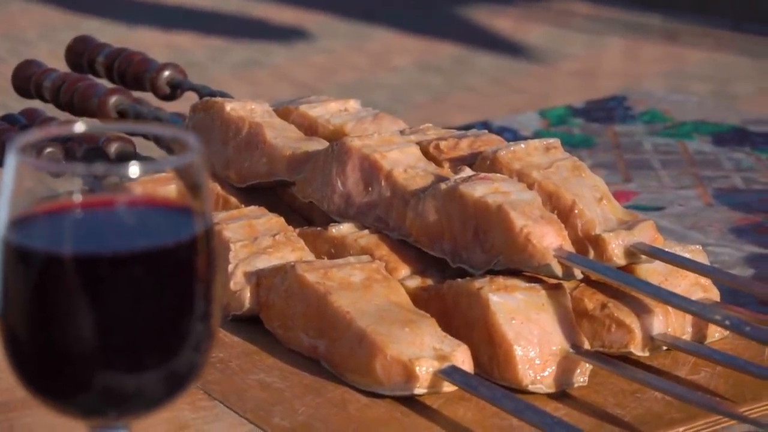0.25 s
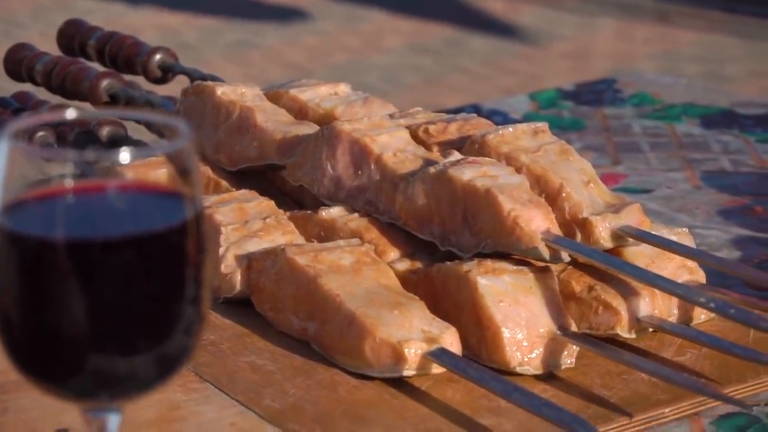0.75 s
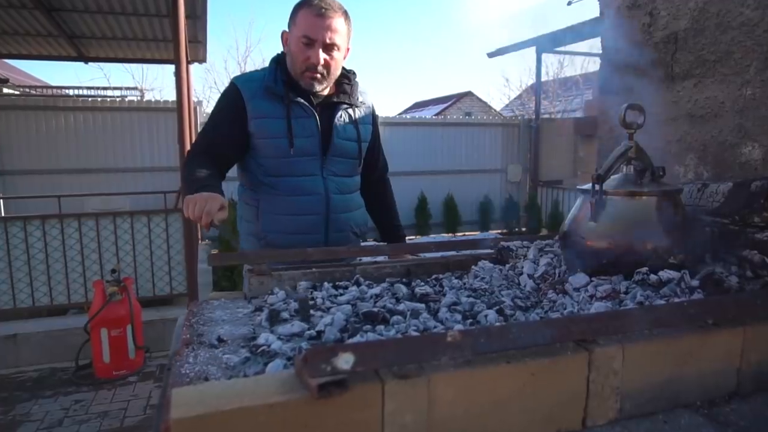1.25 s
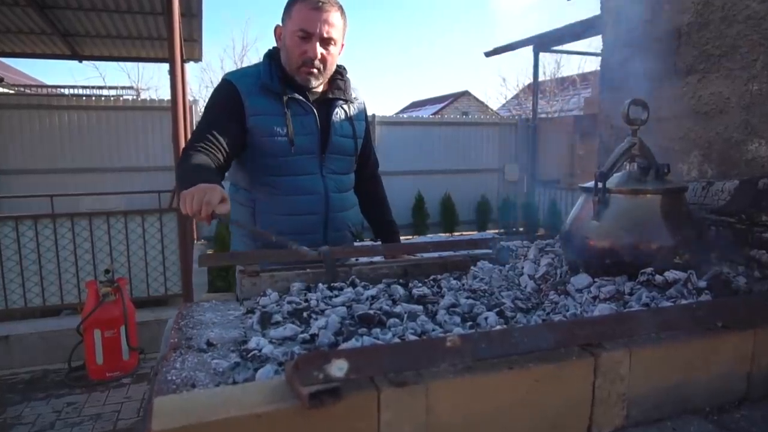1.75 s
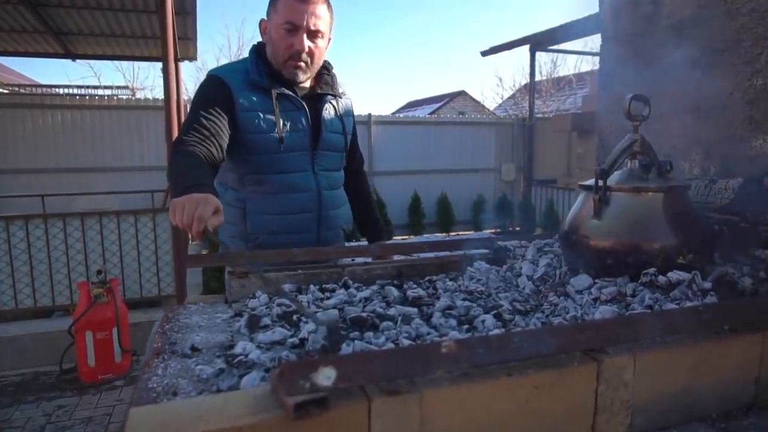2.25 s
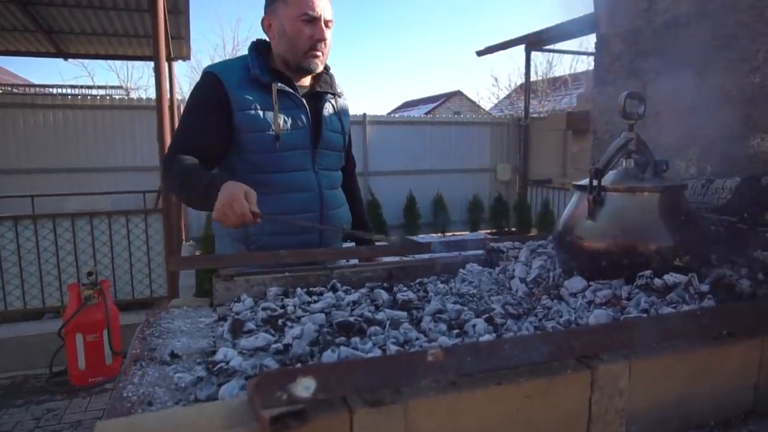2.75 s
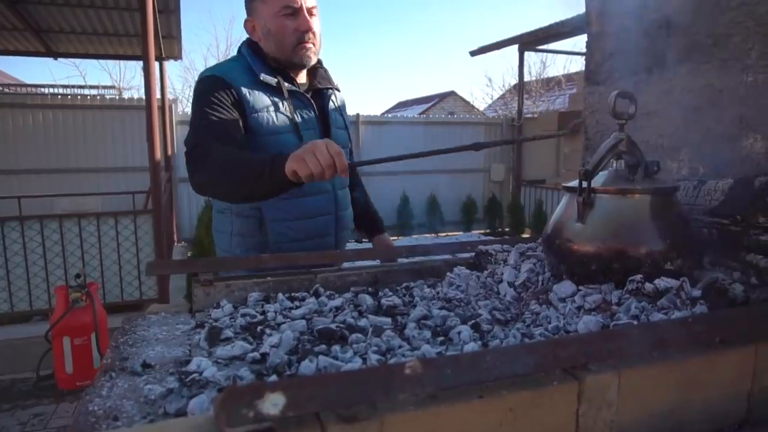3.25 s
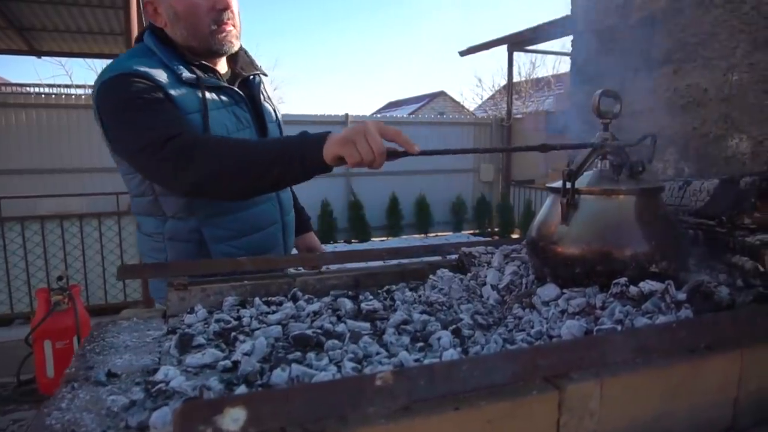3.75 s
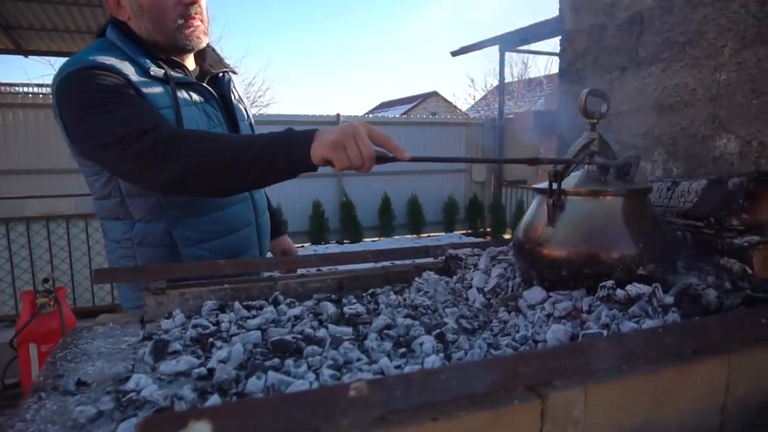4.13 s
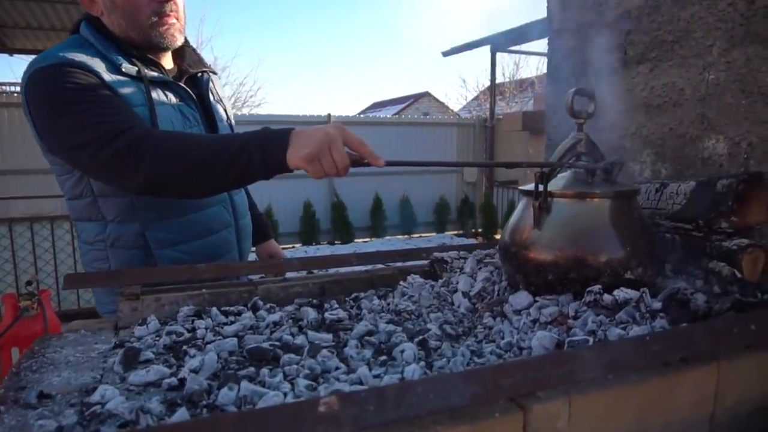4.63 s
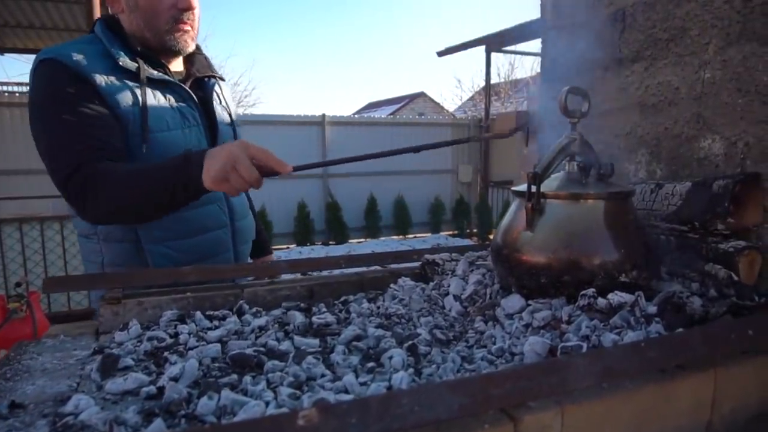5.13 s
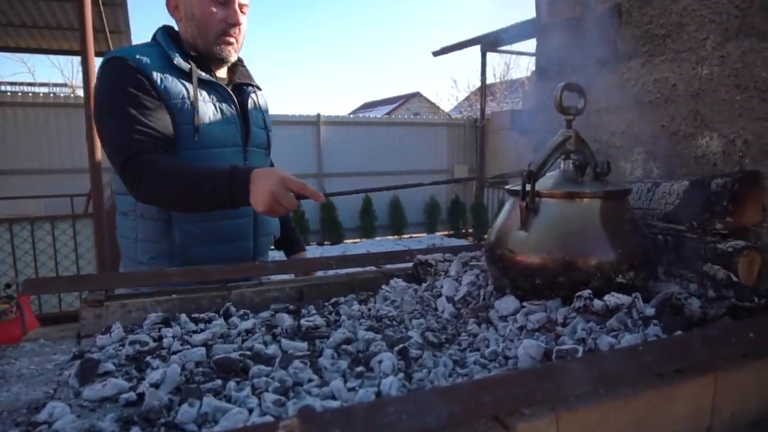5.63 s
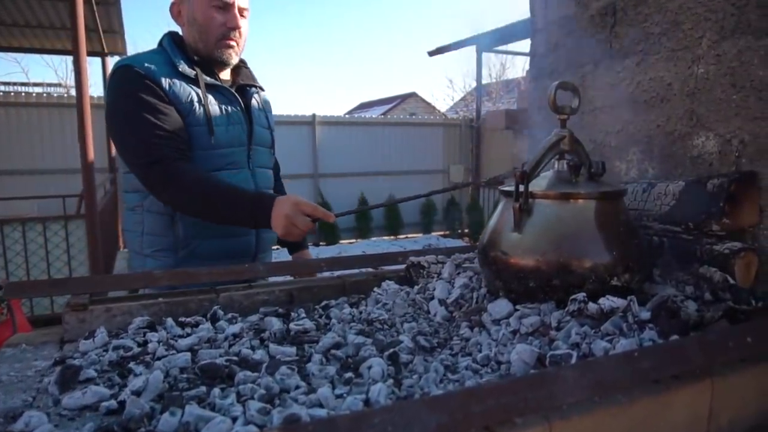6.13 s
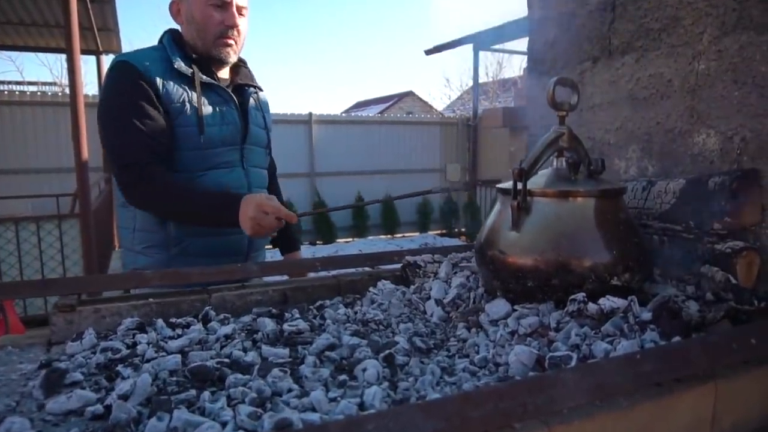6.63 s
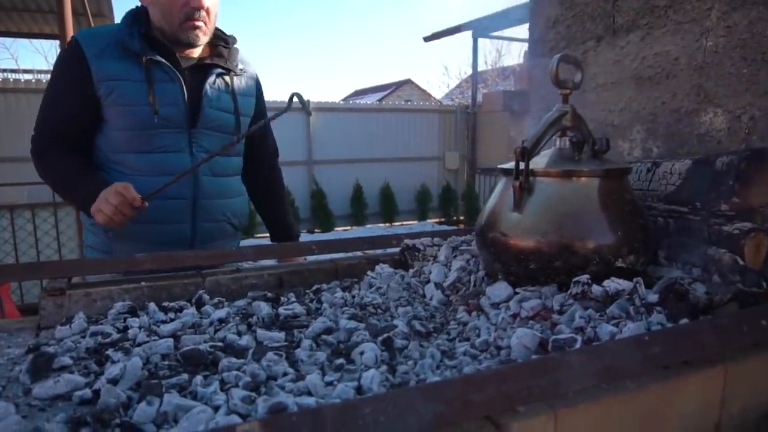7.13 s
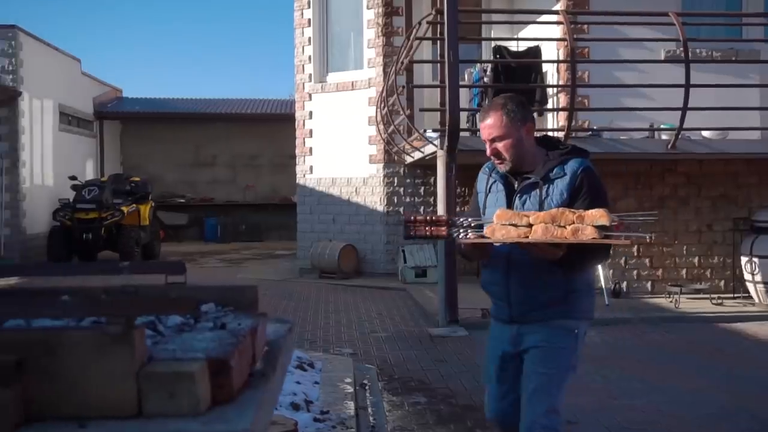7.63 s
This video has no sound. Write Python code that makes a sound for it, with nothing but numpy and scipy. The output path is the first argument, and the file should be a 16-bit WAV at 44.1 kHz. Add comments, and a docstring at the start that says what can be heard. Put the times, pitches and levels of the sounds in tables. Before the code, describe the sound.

Calm yard rumble cuts to leaking steam and crunching charcoal, then a poker clanks on a valve and bright steam blasts out twice.

```python
"""First comes about a second of calm yard: a distant rumble, faint air hiss and a few ticks over a deep drone.
Then, abruptly, a pressure kettle on glowing charcoal: steam leaks past its weighted valve as flickering noise.
A poker stabs the coals (clusters of clicks), then clanks on the valve (ringing modes) and lifts it, so steam jets out.
Shoes scuff the paving, embers crackle as random clicks, and the yard behind is smooth coloured noise.
A gain control holds the loud jets nearly level, so the yard sinks beneath them."""
import sys
import numpy as np
from scipy import signal
from scipy.fft import rfft, irfft, next_fast_len
from scipy.io import wavfile
from scipy.ndimage import uniform_filter1d, map_coordinates

SR = 44100
rng = np.random.default_rng(int(sys.argv[2]) if len(sys.argv) > 2 else 0)


def unload_audio(sound):
    """Save the sound as a 16-bit wav file, at the path given as the first command line argument."""
    columns = np.transpose(np.atleast_2d(sound))
    # keep every value between -1 and 1, then stretch to whole-number steps
    steps = np.round(np.clip(columns, -1, 1) * 32767)
    wavfile.write(sys.argv[1], SR, steps.astype(np.int16))


N = 347688
TIME = np.arange(N) / SR   # seconds

# All "colours" are spectra: pitch_hz, level_db (power per Hz, only the shape counts)

# Steam leaking past the seated valve: time_s, level_db, top_db (treble above 9600 Hz, relative to the rest)
LEAK = [(0.96, -33, -8.5), (1.12, -38.5, -7), (1.55, -40, -5.5), (1.95, -39, -4), (2.06, -36, -7.5),
        (2.55, -43.5, -2.5), (2.67, -38.5, -5), (2.75, -44, -2.5), (2.88, -40, -1.5), (3.32, -35.5, -3.5),
        (3.75, -37.5, -5), (3.83, -41.5, -7), (4.2, -37.5, -6), (4.9, -36, -2.5), (5.5, -35, -3.5),
        (6.55, -36.5, -4.5), (7.46, -36, -5.5), (7.6, -40.5, -4.5)]
# Colour of the leaking steam: pitch_hz, level_db
LEAK_COLOUR = [(1500, -15), (2150, -27), (3400, -15), (4050, -7.5), (4500, -10), (5100, 0.5), (5750, 1),
               (6400, -3.5), (7800, -3), (8900, -8), (10200, -16), (12000, -16), (13500, -10), (15000, -7)]
# Resonances of the narrow vent pipe: pitch_hz, width_hz (two filters in a row, each twice this wide), level_db
VENT_PIPE = [(2930, 420, -8), (5820, 330, 0), (8750, 500, -15), (14750, 700, -12)]
# From each start time the hiss has this pipe sound:
# start_s, pipe_db (relative to the leak), lowest_db (extra on the lowest resonance), wobble_db
PIPE_SOUNDS = [(0.958, -3, -4, .5), (2.75, -6, -.5, .5), (3.75, -4, -7, .5), (4.86, -3, -12, .4),
               (6.47, -15, 4, 1.7), (7.48, -19, 2, 1.0)]
# The poker lifts the valve: opens_s, attack_s, widest_s, drops_s, opening_db, swell_db (extra at the widest)
LIFTS = [(4.051, .004, 4.068, 4.071, -28, 4.5), (4.107, .01, 4.175, 4.21, -34.5, 4),
         (4.28, .009, 4.315, 4.322, -19, 1.5), (4.33, .012, 4.68, 4.858, -17.5, 9),
         (5.63, .006, 5.645, 5.652, -21.5, 2.5), (5.658, .035, 6.3, 6.462, -20.5, 7.5)]
SWELL_SHAPE = .8   # under 1 the valve lingers near its widest
JET_T60_S = .05   # time for a jet to fall by 60 dB once the valve drops
VALVE_TURNED_S = 5.5   # jets after this have the second colour
# Colour of the jets before the valve is turned: pitch_hz, level_db
FIRST_JET_COLOUR = [(700, -33), (1300, -20.5), (2600, -17.5), (3800, -13), (4900, -4), (5900, 1), (6700, 2),
                    (8000, 1.5), (9000, -1.5), (10000, -6), (12000, -7), (15500, -4.5)]
# Colour of the jets after the valve is turned: pitch_hz, level_db
SECOND_JET_COLOUR = [(600, -41), (1200, -21), (2200, -20), (3100, -15), (4400, -4), (5300, -1), (6300, 0.5),
                     (8000, 1.5), (9000, -0.5), (10200, -7), (11500, -12), (13000, -8), (14700, -5.5)]
# The hiss also arrives by a detour off a hard surface, which drifts as the listener moves
# and jumps at 7.48 s, where the position changes abruptly: time_s, lag_ms
DETOUR = [(1.7, .98), (1.85, 1.04), (2.5, 1.07), (2.65, 1.02), (3.1, 1.0), (3.55, 1.1), (4.3, 1.03),
          (4.7, 1.045), (5.5, 1.03), (5.68, 1.15), (6.0, 1.12), (6.6, 1.16), (7.478, 1.19), (7.482, .94)]
REFLECTION = .52   # strength of the reflected treble against the direct hiss

# Poker on the valve: start_s, level_db, brightness_hz, thud_db (thud of the kettle)
CLANKS = [(4.052, -22.5, 2000, -35), (4.066, -26, 2030, -33), (4.106, -25, 7000, -40),
          (4.22, -33, 1200, -45), (4.85, -23, 6000, -37), (5.504, -8, 6000, -36), (5.545, -24, 1200, -33),
          (5.631, -13.5, 7000, -20), (5.641, -25, 2500, -33), (6.423, -18, 2000, -35)]
# Ringing modes of valve and poker, before chance varies each clank: pitch_hz, level_db, t60_s
VALVE_MODES = [(493, -19, 0.047), (895, -18.5, 0.044), (1146, -5, 0.029), (1364, -8, 0.038),
               (1593, -13, 0.037), (1880, -4.5, 0.017), (2207, -27.5, 0.1), (2446, -16, 0.07),
               (2690, -10, 0.034), (2950, -11, 0.067), (3390, -1.5, 0.012), (4050, -15, 0.044),
               (4570, -12, 0.02), (6560, -12, .015)]
# After the last lift the valve rattles back onto its seat; timing and level vary around these
RATTLE_START_S, RATTLE_GAP_S, RATTLE_DB, RATTLE_HZ, RATTLE_THUD_DB = 6.447, .0125, -22.5, 3000, -46

# Poker stabbing the coals: start_s, grit_db, length_s, brightness_hz, thud_hz, thud_db
STABS = [(1.2405, -19, 0.0057, 9000, 278, -30.5), (1.5255, -29, 0.0094, 2500, 220, -34),
         (1.899, -20.5, 0.0057, 9000, 533, -36), (1.907, -21, 0.0062, 9000, 553, -38),
         (2.208, -26.5, .006, 6000, 593, -43), (2.22, -30.5, 0.011, 4000, 520, -33)]
# Colour of crunching coals: pitch_hz, level_db
COALS_COLOUR = [(200, -6), (400, -20), (570, 3.5), (850, -26), (1130, 4), (1350, -10), (1560, 1),
                (1900, -5), (2250, 0), (2600, -9), (4200, 0), (8000, 3.5), (11000, -4), (15500, -2)]
# Shoes on paving; the row at 6.423 is the low thud of the kettle as the valve drops:
# start_s, grit_db, length_s, brightness_hz, thud_hz, thud_db
SCUFFS_AND_THUD = [(3.291, -41.5, 0.011, 1500, 360, -30.5), (3.318, -39.5, 0.022, 2500, 250, -45),
                   (3.588, -42, 0.073, 1500, 450, -38), (3.655, -48, 0.062, 1000, 600, -44),
                   (6.423, -48, 0.048, 800, 158, -42.5), (6.66, -50, 0.3, 1800, 500, -58),
                   (7.519, -38, 0.025, 1200, 270, -35), (7.555, -36.5, 0.015, 2000, 182, -43),
                   (7.582, -42, .01, 1500, 200, -42), (7.6, -47, 0.17, 800, 377, -46)]
# Colour of grit on paving: pitch_hz, level_db
PAVING_COLOUR = [(200, -19.5), (600, -2.5), (1200, -0.5), (2100, 2), (3200, 1.5), (6000, 1), (14000, 2)]
# Sharp ticks and crackles: start_s, level_db (before a fixed boost), pitch_hz, t60_s
TICKS = [(.4545, -23, 5500, 0.011), (0.456, -27, 1630, 0.039), (0.521, -28.5, 7000, .004),
         (0.716, -30.5, 6000, 0.0051), (0.721, -34.5, 8000, 0.0033), (1.313, -27, 1300, .012),
         (2.56, -26.5, 3500, 0.01), (2.99, -22, 4500, 0.0057), (4.852, -15, 3000, .025),
         (7.344, -29, 1300, 0.013), (7.478, -15.5, 3300, 0.014), (7.478, -12.5, 7200, 0.0024),
         (7.691, -19.5, 2200, .016)]

# The deep drone: time_s, level_db
DRONE = [(0.0, -37.5), (0.22, -33), (0.66, -37.5), (0.92, -34), (1.05, -46), (1.55, -50), (1.95, -40),
         (2.45, -44.5), (3.4, -41), (4.25, -42.5), (4.5, -53), (4.95, -45), (5.2, -48), (5.42, -37),
         (6.0, -52), (6.5, -55), (7.2, -46.5), (7.88, -43)]
# Yard background at the grill: time_s, level_db
YARD = [(1.4, -49), (2.6, -46.5), (6.8, -48.3), (7.88, -46.5)]
# Colour of the yard background: pitch_hz, level_db
YARD_COLOUR = [(44, -34), (75, -7), (229, -6.5), (249, -8), (313, -1), (345, -5.5), (371, -6.5), (829, -6),
               (903, -3.5), (1550, -15), (2200, -15.5), (2860, -17), (4840, -120)]
# The calm spot: time_s, rumble_db, air_db (air hiss, before a fixed boost)
CALM = [(0.0, -37, -50.5), (0.12, -37.5, -55.5), (0.94, -39.5, -60.5)]
# Colour of the distant rumble: pitch_hz, level_db
RUMBLE_COLOUR = [(26, -20), (45, -12), (60, -9.5), (146, -13.5), (215, -20.5), (346, -20), (491, -19.5),
                 (1030, -17), (1200, -22.5), (2260, -36.5), (3000, -40.5), (3900, -82), (6600, -120)]
# Colour of the air hiss: pitch_hz, level_db
AIR_COLOUR = [(2500, -6), (3500, -0.5), (5000, -2), (7600, -0.5), (10000, -8.5), (15500, -15)]
GRILL_START_S = .958   # the calm spot ends here

# Gain control: threshold, share of the excess decibels taken away, time over which it listens
HOLD_DB, HOLD_SHARE, HOLD_S = -20.0, .92, .025
CEILING = .6   # the highest peaks are rounded off towards this
CUTOFF_HZ = 15850   # almost nothing is left above this


def kettle():
    """Steady leak plus a jet at each lift; the hardest clank turns the valve and changes the jet's colour."""
    straight = steam(FIRST_JET_COLOUR, flutter_db=0.44, sputter_db=1.1, patchy_db=.7)
    turned = steam(SECOND_JET_COLOUR, flutter_db=0.8, sputter_db=1.1, patchy_db=1.4)
    jets = np.zeros(N)
    for lift in LIFTS:
        hiss = turned if lift[0] > VALVE_TURNED_S else straight
        jets += jet_level(*lift) * hiss
    return reflected(leak() + jets, share=REFLECTION)


def leak():
    """Steam squeezes past the seated valve and sounds the resonances of the vent pipe."""
    pipe_db, lowest_db, wobble_db = pipe_sound()
    hiss = steam(LEAK_COLOUR, flutter_db=0.52, sputter_db=1.05, patchy_db=.7)
    body = rms_one(butter(hiss, 9500, "low", order=4))
    top = rms_one(butter(hiss, 9600, "high", order=4))
    flow = rng.standard_normal(N)
    tones = []
    for hz, width, db in VENT_PIPE:
        once = resonance(flow, hz, 2 * width)
        tones.append(from_db(db) * resonance(once, hz, 2 * width))
    lowest, upper = tones[0], sum(tones[1:])
    pipe = rms_one(lowest * from_db(lowest_db) + upper)
    pipe = pipe * from_db(pipe_db + 1.0 * drift(6.2))
    level = from_db(in_time(LEAK) + wobble_db * drift(21))
    return level * (body + pipe + from_db(in_time(LEAK, column=2)) * top)


def pipe_sound():
    """Pipe level, extra level of its lowest resonance and wobble, each held until the next row."""
    rows = np.array(PIPE_SOUNDS)
    latest = np.maximum(np.searchsorted(rows[:, 0], TIME) - 1, 0)
    return uniform_filter1d(rows[latest, 1:].T, size=2000, axis=1)   # soften the steps


def jet_level(opens, attack_s, widest, drops, db, swell_db):
    """The valve cracks open, is eased up to its widest and back, and drops shut."""
    lift = np.interp(TIME, [opens, widest, drops], [0, 1, 0]) ** SWELL_SHAPE
    attack = np.clip((TIME - opens) / attack_s, 0, 1)
    fall_db = 60 * np.clip(TIME - drops, 0, 1) / JET_T60_S
    return attack * from_db(db + swell_db * lift - fall_db)


def steam(spectrum, flutter_db, sputter_db, patchy_db):
    """Turbulent hiss: droplets in the gap make it flutter and sputter, and its three registers waver apart."""
    hiss = noise(spectrum)
    low = butter(hiss, 4300, "low", order=1)
    below_top = butter(hiss, 8700, "low", order=1)
    registers = (low, below_top - low, hiss - below_top)
    hiss = sum(part * from_db(patchy_db * drift(6.8)) for part in registers)
    return rms_one(hiss * from_db(flutter_db * drift(33) + sputter_db * drift(500)))


def reflected(x, share):
    """A small hard surface nearby returns mainly the lower treble and combs the hiss into shifting ridges."""
    smooth = (x + 2 * uniform_filter1d(x, size=3)) / 3
    treble = smooth - uniform_filter1d(x, size=9)
    lag_samples = in_time(DETOUR) * SR / 1000
    late = map_coordinates(treble, [np.arange(N) - lag_samples], order=3)
    return (x + share * late) / np.sqrt(1 + share ** 2)


def clanks():
    """Each touch of the poker rings the valve's modes with strengths of its own, and jolts the kettle."""
    out, t = np.zeros(N), TIME[:SR // 4]
    hz, mode_db, t60 = np.transpose(VALVE_MODES)[:, :, None]
    for s, db, bright_hz, thud_db in CLANKS + rattle(count=4):
        strength = from_db(mode_db + 2.4 * rng.standard_normal(hz.shape))
        strength = strength * rng.choice([-1, 1], hz.shape)
        # the contact point shifts the heavily damped modes most
        pitch = hz + rng.standard_normal(hz.shape) * 1.06 / t60
        modes = strength * from_db(-60 * t / t60) * np.sin(2 * np.pi * pitch * t)
        ring = np.sum(modes, axis=0)
        crack = from_db(-9.5) * rng.standard_normal(len(t)) * from_db(-60 * t / 0.025)
        thud = np.sin(2 * np.pi * 380 * t) * from_db(-60 * t / 0.029)
        clank = butter(ring + crack, bright_hz, "low", order=1)
        add(out, s, from_db(db) * clank + from_db(thud_db) * thud)
    return butter(out, 79, "high")


def rattle(count):
    """Uneven light touches of the valve on its seat, as rows like those of CLANKS."""
    rows = []
    for k, (late, strong) in enumerate(rng.standard_normal((count, 2))):
        start_s = RATTLE_START_S + RATTLE_GAP_S * (k + .3 * late)
        rows.append((start_s, RATTLE_DB + 2.5 * strong, RATTLE_HZ, RATTLE_THUD_DB))
    return rows


def crunches(events, spectrum, grain_db, grit_t60, thud_t60, thud_width):
    """Brittle grains give way in a quick cluster of clicks, over a dull thud."""
    out, t = np.zeros(N), TIME[:SR // 4]
    uneven = rng.standard_normal(N) * from_db(grain_db * rng.standard_normal(N))
    grains = colour(uneven, spectrum) * from_db(0.73 * drift(380))
    for s, db, length, bright_hz, thud_hz, thud_db in events:
        after = np.maximum(t - length, 0)   # the decay waits until the press is over
        grit = rms_one(butter(grains[int(s * SR):][:len(t)], bright_hz, "low", order=1))
        dull = butter(rng.standard_normal(len(t)), 2.0 * thud_hz, "low")
        thud = rms_one(resonance(dull, thud_hz, thud_width * thud_hz))
        press = 1 - np.exp(-t / (0.1 * length))
        grit = from_db(db - 60 * after / grit_t60) * grit
        thud = from_db(thud_db - 60 * after / thud_t60) * thud
        add(out, s, press * (grit + thud))
    return out


def ticks():
    """A snap is a burst that dies at once, coloured by one broad resonance."""
    out, t = np.zeros(N), TIME[:SR // 8]
    for s, db, hz, t60 in TICKS:
        burst = rng.standard_normal(len(t)) * from_db(-60 * t / t60)
        add(out, s, from_db(db + 6.5) * resonance(burst, hz, 0.47 * hz))
    return out


def yard_echo(x, t60, wet_db):
    """Fence and wall return a short, dull scatter."""
    t = TIME[:SR // 2]
    scatter = butter(rng.standard_normal(len(t)), 5200, "low")
    scatter = scatter * from_db(-60 * t / t60) * (t > .008)   # nothing returns in the first 8 ms
    echo = signal.fftconvolve(x, scatter / np.linalg.norm(scatter))[:N]
    return x + from_db(wet_db) * echo


def embers(per_s, level_db):
    """Charcoal crackles faintly at random, each crack at one of eight pitches."""
    sizes = from_db(2.2 * np.minimum(rng.exponential(1, N), 3)) * rng.choice([-1, 1], N)
    cracks = sizes * (rng.random(N) < per_s / SR)
    dealt = rng.integers(0, 8, N)   # which pitch each crack gets
    out = np.zeros(N)
    for k, hz in enumerate(np.geomspace(1200, 8000, 8)):
        # the tiny constant keeps the filter's numbers from becoming too small to compute quickly
        out += resonance(cracks * (dealt == k) + 1e-18, hz, 0.42 * hz)
    return from_db(level_db) * out


def drone():
    """A wavering tone at the bottom of hearing, in a skirt of rumble."""
    phase = 2 * np.pi * np.cumsum(31.2 + 1.6 * drift(4)) / SR   # Hz, added up into phase
    tone = rms_one(np.sin(phase) * from_db(2.5 * drift(5)))
    skirt = noise([(24, 6), (36, -6.5), (50, -11), (80, -15)])
    return from_db(in_time(DRONE)) * rms_one(tone + from_db(-5) * skirt)


def yard():
    """The background at the grill: smooth coloured noise with a slowly changing level."""
    return from_db(in_time(YARD)) * noise(YARD_COLOUR)


def calm_spot():
    """The calm opening: distant rumble and air hiss, each a smooth coloured noise."""
    rumble = from_db(in_time(CALM)) * noise(RUMBLE_COLOUR)
    air = from_db(in_time(CALM, column=2) + 2.5) * noise(AIR_COLOUR)
    return rumble + air


def from_db(db):
    """Decibels to gain."""
    return 10 ** (np.asarray(db) / 20)


def rms_one(x):
    """Scale to unit power."""
    return x / np.sqrt(np.mean(x ** 2) + 1e-20)


def in_time(rows, column=1):
    """One column of a curve at every sample."""
    rows = np.array(rows)
    return np.interp(TIME, rows[:, 0], rows[:, column])


def drift(rate):
    """Chance that wanders at about this rate in Hz, with a spread of 1."""
    step = 40   # samples between computed points
    r = np.exp(-2 * np.pi * rate * step / SR)
    chance = rng.standard_normal(N // step + 2002)
    slow = signal.lfilter([1], [1, -2 * r, r * r], chance)[2000:]   # skip the filter's start
    return np.interp(np.arange(N) / step, np.arange(len(slow)), rms_one(slow))


def butter(x, hz, kind, order=2):
    """Causal low- or high-pass filter."""
    hz = np.clip(hz, 10, .45 * SR)
    return signal.sosfilt(signal.butter(order, hz, kind, fs=SR, output="sos"), x)


def colour(x, spectrum):
    """Give x a spectrum that falls steeply beyond its ends; unit power."""
    hz, db = np.transpose(spectrum)
    octave = np.log2(np.maximum(np.arange(N + 1) * SR / (2 * N), 1))
    beyond = np.abs(octave - np.clip(octave, np.log2(hz[0]), np.log2(hz[-1])))
    gain = from_db(np.interp(octave, np.log2(hz), db) - 18 * beyond)   # 18 dB per octave
    size = next_fast_len(N)
    gain = np.interp(np.arange(size // 2 + 1) / size, np.arange(N + 1) / (2 * N), gain)
    return rms_one(irfft(rfft(x, size) * gain, size)[:N])


def noise(spectrum):
    """Smooth coloured noise."""
    return colour(rng.standard_normal(N), spectrum)


def resonance(x, hz, width_hz):
    """Two-pole resonance with gain 1 on top."""
    r = np.exp(-np.pi * width_hz / SR)
    feed = np.array([1, 0, -1]) * (1 - r * r) / 2
    return signal.lfilter(feed, [1, -2 * r * np.cos(2 * np.pi * hz / SR), r * r], x)


def add(out, s, sound):
    """Mix a sound in at time s."""
    start = int(s * SR)
    out[start:start + len(sound)] += sound[:N - start]


def gain_control(x):
    """Loud sound is held nearly level, so the yard sinks away under each long jet."""
    keep = np.exp(-1 / (HOLD_S * SR))
    power = signal.lfilter([1 - keep], [1, -keep], np.mean(x ** 2, axis=0))
    excess_db = np.maximum(10 * np.log10(power + 1e-12) - HOLD_DB, 0)
    return x * from_db(-HOLD_SHARE * excess_db)


def scene():
    """The calm spot gives way abruptly to the grill; both channels are alike."""
    grill = kettle() + embers(per_s=4.9, level_db=-26) + yard()
    stabs = crunches(STABS, COALS_COLOUR, grain_db=2.5, grit_t60=0.014, thud_t60=0.051, thud_width=0.49)
    scuffs_and_thud = crunches(SCUFFS_AND_THUD, PAVING_COLOUR,
                               grain_db=5.0, grit_t60=.05, thud_t60=.08, thud_width=.8)
    knocks = yard_echo(clanks() + stabs + scuffs_and_thud + ticks(), t60=.22, wet_db=-20.5)
    place = np.where(TIME < GRILL_START_S, calm_spot(), grill)
    mono = place + knocks + drone()
    return np.array([mono, mono])


def record(dry):
    """The gain control acts, the hardest peaks are rounded, and the top is cut steeply."""
    held = gain_control(dry)
    rounded = held / (1 + (held / CEILING) ** 6) ** (1 / 6)
    top_cut = signal.ellip(12, .1, 80, CUTOFF_HZ, fs=SR, output="sos")
    return signal.sosfilt(top_cut, rounded)


dry = scene()
out = record(dry)
unload_audio(out)
```